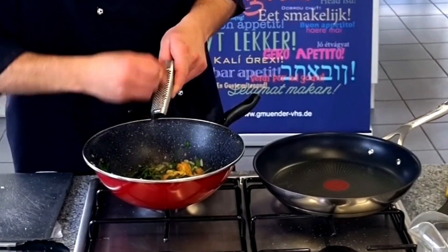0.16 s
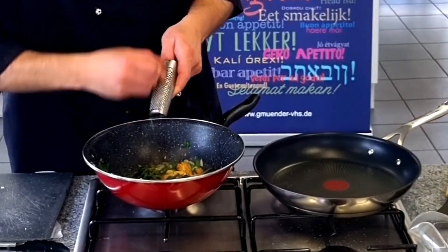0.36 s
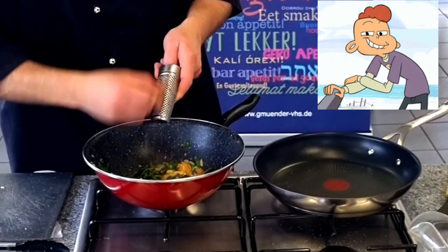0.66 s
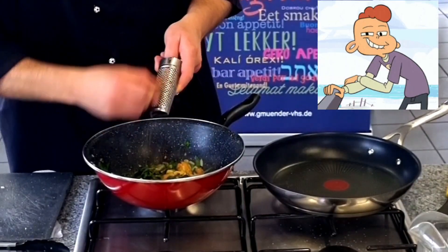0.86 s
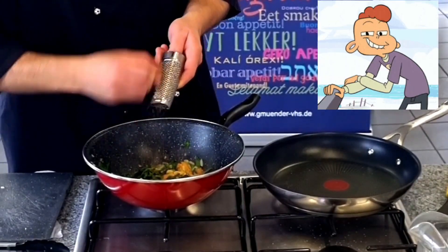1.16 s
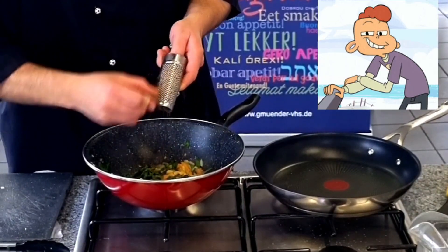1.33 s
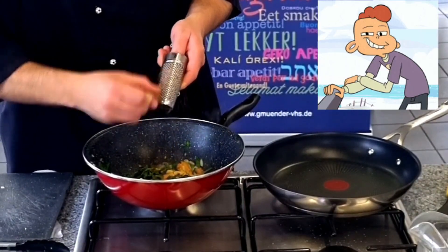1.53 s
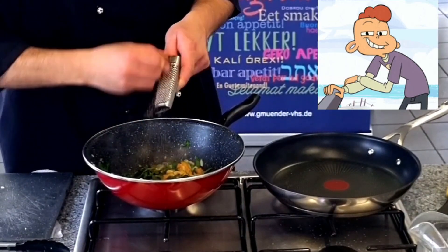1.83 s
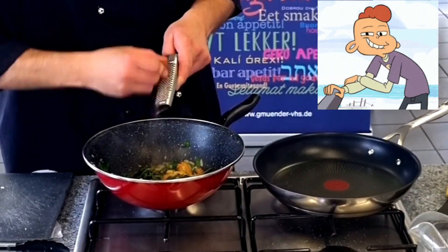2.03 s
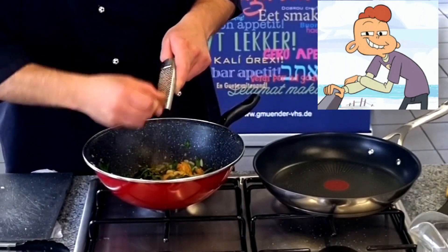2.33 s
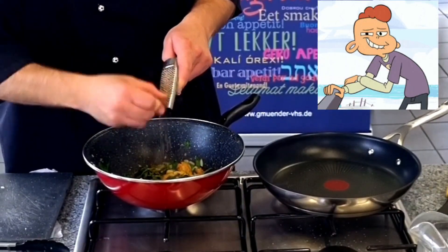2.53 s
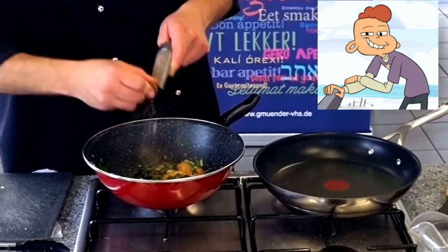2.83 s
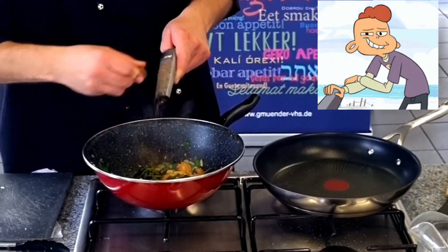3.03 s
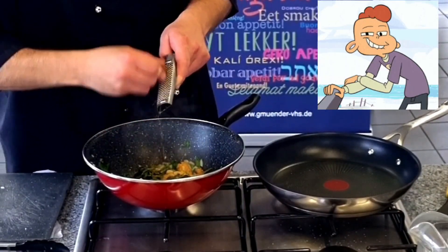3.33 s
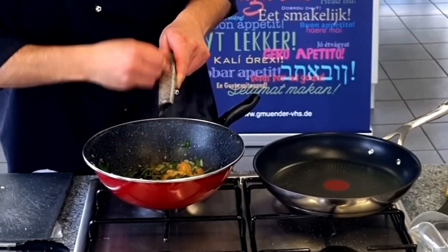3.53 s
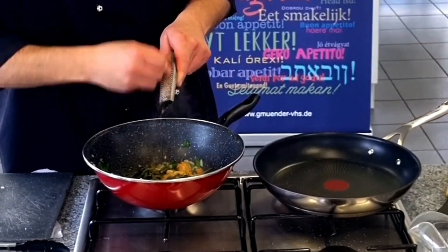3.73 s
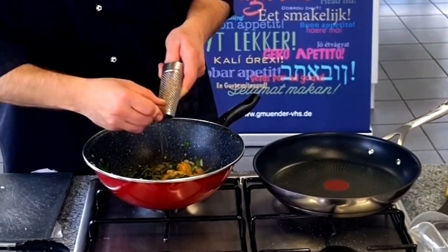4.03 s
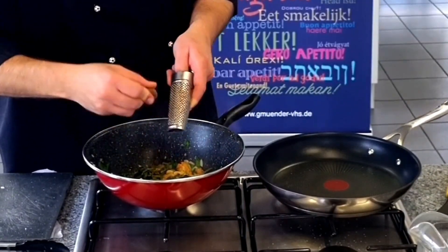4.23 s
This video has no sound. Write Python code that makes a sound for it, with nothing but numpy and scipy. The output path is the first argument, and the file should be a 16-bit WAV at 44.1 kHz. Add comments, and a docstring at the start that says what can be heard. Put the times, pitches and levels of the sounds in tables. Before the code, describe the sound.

Nutmeg is scraped on a small metal grater in quick, even strokes, pausing briefly before resuming over a faint hum.

```python
"""A tiled kitchen, a stereo pair close to a small steel hand grater, almost straight ahead.
A whole nutmeg is rubbed up and down, about ten strokes a second, biting faster on the way down.
The teeth chip it in dense tiny fractures that crackle and ring the curved sheet; now and then one snags.
After a short pause the nut is set back on the steel for a lighter second run.
The tiles answer briefly, and the ventilation hums low behind it all."""
import sys
import numpy as np
from scipy import signal
from scipy.fft import rfft, irfft
from scipy.io import wavfile
from scipy.ndimage import uniform_filter1d

SR = 44100
rng = np.random.default_rng(int(sys.argv[2]) if len(sys.argv) > 2 else 0)


def output_pcm(signal):
    """Save a mono or channel-first signal as 16-bit PCM at the path in sys.argv[1].

    Samples are clipped to [-1, 1] before scaling.
    """
    pcm = np.clip(np.atleast_2d(signal).T, -1, 1) * 32767
    wavfile.write(sys.argv[1], SR, np.round(pcm).astype(np.int16))


N = 193554
GLIDE_S = 0.016  # the nut skims the teeth this long before and after a stroke

# strokes of the nut over the teeth, up and down by turns: start_s, length_s, force_db
STROKES = [(-0.038, 0.078, -43), (0.061, 0.071, -43.5), (0.143, 0.089, -43), (0.253, 0.084, -42),
           (0.348, 0.085, -41.5), (0.455, 0.072, -40.5), (0.546, 0.081, -42), (0.659, 0.075, -41.5),
           (0.754, 0.076, -38.5), (0.854, 0.086, -38.5), (0.948, 0.091, -39.5), (1.06, 0.071, -41.5),
           (1.171, 0.082, -38), (1.274, 0.071, -37), (1.369, 0.09, -37.5), (1.476, 0.067, -37),
           (1.57, 0.091, -42.5), (1.679, 0.064, -39), (1.754, 0.089, -39.5), (1.871, 0.085, -39.5),
           (1.978, 0.068, -39.5), (2.084, 0.063, -38.5), (2.165, 0.096, -43), (2.276, 0.08, -39),
           (2.372, 0.098, -41.5), (2.484, 0.081, -39), (2.583, 0.093, -40), (2.688, 0.076, -38.5),
           (3.255, 0.082, -49.5), (3.366, 0.079, -46), (3.456, 0.097, -44.5), (3.563, 0.085, -41),
           (3.664, 0.11, -44.5), (3.769, 0.081, -41), (3.876, 0.093, -43.5), (3.982, 0.086, -42.5)]
# how freely the steel rings as the grip shifts: time_s, wall_db, body_db
RINGING = [(0.05, 5, -7.5), (0.27, 1, -2.5), (0.46, 5.5, 2), (0.7, 3.5, -1), (1.4, -0.5, -5),
           (1.87, 0, -3.5), (2.5, 2, -7.5), (3.26, -1, -4), (3.56, 3, -10), (3.88, 1, -5),
           (3.98, -1.5, -0.2)]
# spectrum of breaking nutmeg: frequency_hz, level_db
CRACKLE = [(150, -21), (330, -19.5), (650, -1), (1100, 0.5), (1700, -3), (2800, 6), (4050, -1), (4600, 4.5),
           (5500, 3), (6100, -3.5), (7000, 0.5), (8500, -9.5), (11700, -5), (13500, -5), (15800, -10.5)]
# modes of the toothed wall: pitch_hz, width_hz, level_db
WALL_MODES = [(2020, 35, -9), (2180, 72, -6.5), (2272, 87, 1.5), (2410, 124, -6), (2528, 137, -2),
              (2644, 120, -15), (2930, 32, -14), (3070, 70, -6.5), (3422, 14, -7), (3648, 35, -8.5)]
# bending modes of the whole grater: pitch_hz, width_hz, level_db
BODY_MODES = [(497, 89, -15), (869, 9, -8), (924, 20, 3.3), (984, 38, -5), (1131, 21, -9), (1266, 52, -14),
              (1369, 75, -8)]
def grating(size=7168):
    """Close up, stroke by stroke: fine breaks crackle and coarser chips ring the steel."""
    out, crackle = np.zeros((2, N + 2 * size)), colour(CRACKLE)
    time_s, *ringing = np.transpose(RINGING)
    for k, (start_s, length_s, force_db) in enumerate(STROKES):
        pressure = hand_pressure(length_s, down=k % 2, size=size)
        wall_db, body_db = (np.interp(start_s, time_s, column) for column in ringing)
        bite = tooth_rows(rows_hz=139.7, uneven=0.394, depth_db=1.65, size=size)
        # cutting needs real force, while the body already answers a light touch
        cut, push, touch = (pressure ** power * bite for power in (1.3, 1.2, .6))
        fine = fractures(per_second=10000, spread_db=-1.5, dust_db=1.0, size=size)
        chips = fractures(per_second=1300, spread_db=3.5, dust_db=-9.0, size=size)
        grit = undb(-3.0) * (driven(fine, crackle, cut) + rasp(cut, crackle))
        wall_ring = ring(WALL_MODES, detune=0.012, scatter_db=2.5, size=2048)
        body_ring = ring(BODY_MODES, detune=0.0014, scatter_db=2.2)
        wall = undb(wall_db) * driven(chips, wall_ring, push)
        body = undb(body_db) * driven(chips, body_ring, touch)
        # the wall faces the microphones and reaches them straight
        stroke = stereo_spread(grit + body, side_db=-6.5, treble_db=0.0) + wall
        at = int((start_s - GLIDE_S) * SR) + size
        out[:, at:at + size] += undb(force_db) * stroke
    return out[:, size:size + N]


def hand_pressure(length_s, down, size, skim=0.22):
    """Skim, press in, slide, ease off, skim; going down, the nut meets the teeth head-on, biting sooner."""
    press, ease = (0.16, 0.49) if down else (0.25, 0.32)  # shares of the stroke
    corners_s = [-GLIDE_S, 0, press * length_s, (1 - ease) * length_s, length_s, length_s + GLIDE_S]
    return np.interp(np.arange(size) / SR - GLIDE_S, corners_s, [0, skim, 1, 1, skim, 0])


def tooth_rows(rows_hz, uneven, depth_db, size):
    """The bite swells each time the nut rides over a row of teeth, at a wandering pace."""
    pace = np.repeat(np.exp(uneven * rng.standard_normal(size // 256 + 1)), 256)[:size]
    rows_crossed = rng.random() + np.cumsum(rows_hz * pace) / SR
    bite = undb(depth_db * np.cos(2 * np.pi * rows_crossed))
    return bite / np.sqrt(np.mean(bite ** 2))


def fractures(per_second, spread_db, dust_db, size):
    """Tiny breaks of unequal force over a smooth rub of dust, rms 1."""
    happens = rng.random(size) < per_second / SR
    strength = undb(spread_db * np.minimum(rng.exponential(size=size), 3))
    breaks = happens * strength * rng.choice([-1, 1], size)
    force = breaks / (breaks.std() + 1e-9) + undb(dust_db) * rng.standard_normal(size)
    return force / force.std()


def rasp(push, crackle, patches=3):
    """The nut crosses one patch of teeth after another, and each colours the crackle in its own way."""
    size = len(push)
    travel = np.cumsum(push ** 2) / np.sum(push ** 2) * (patches - 1)
    out = np.zeros(size)
    for patch in range(patches):
        share = np.sqrt(np.clip(1 - abs(travel - patch), 0, 1))
        voice = through(crackle, teeth(low_hz=2700, high_hz=15800, width_hz=170, count=24))
        breaks = fractures(per_second=4000, spread_db=3.5, dust_db=-5, size=size)
        out += driven(breaks, voice, push * share)
    return out


def teeth(low_hz, high_hz, width_hz, count):
    """The teeth under the nut ring at pitches of their own."""
    modes = [(pitch_hz, width_hz, 0) for pitch_hz in rng.uniform(low_hz, high_hz, count)]
    return ring(modes, detune=0, scatter_db=0.5, size=1024)


def ring(modes, detune, scatter_db, size=4096):
    """Damped modes of the steel; pitch and strength depend a little on where the sheet is touched."""
    t = np.arange(size) / SR
    pitch_hz, width_hz, level_db = np.transpose(modes)[:, :, None]
    pitch_hz = pitch_hz * (1 + detune * rng.standard_normal(pitch_hz.shape))
    gain = undb(level_db + scatter_db * rng.standard_normal(pitch_hz.shape)) * width_hz
    phase = 2 * np.pi * rng.random(pitch_hz.shape)
    partials = gain * np.exp(-np.pi * width_hz * t) * np.sin(2 * np.pi * pitch_hz * t + phase)
    onset = 1 - np.exp(-t / 0.0013)  # the wave needs a moment to cross the sheet
    return unit(partials.sum(axis=0) * onset)


def driven(force, response, push):
    """Sound of a part driven by a force; its energy follows the push of the hand."""
    return unit(through(force * push, response)) * np.sqrt(np.sum(push ** 2))


# a tooth snags hard and lets go: start_s, ping_db, crack_db
SNAGS = [(0.0843, -22.5, -47), (0.7674, -23, -30), (0.8732, -27, -26), (1.1905, -26, -25),
         (1.391, -41, -21), (1.79, -31, -33), (1.8892, -23, -49), (2.4127, -23, -29.5), (2.5157, -26, -44),
         (3.395, -28.5, -48), (3.785, -25.5, -39)]
def snags(crack_s, damping_per_s, size=4096):
    """A larger chip tears off in a burst; the freed teeth sing and the wall, damped by the nut, pings."""
    out, t, crackle = np.zeros(N + size), np.arange(size) / SR, colour(CRACKLE)
    for start_s, ping_db, crack_db in SNAGS + light_snags():
        burst = np.sqrt(t) * np.exp(-t / crack_s) * rng.standard_normal(size)
        freed_teeth = teeth(low_hz=4180, high_hz=7070, width_hz=840, count=4)
        crack = through(burst, freed_teeth) + through(burst, crackle)
        ping = ring(WALL_MODES, detune=0.005, scatter_db=5.0) * np.exp(-damping_per_s * t)
        at = int(start_s * SR)
        out[at:at + size] += peak_at(ping, ping_db) + peak_at(crack, crack_db)
    return out[:N]


def light_snags(chance=0.35, mean_share=0.61, ping_over_db=10.5, crack_over_db=7.5):
    """Some strokes catch a little part of the way along, the louder the harder they are pushed."""
    catches = []
    for start_s, length_s, force_db in STROKES:
        luck, place = rng.random(2)
        if luck < chance:
            catch_s = max(start_s + length_s * mean_share * (.5 + place), 0)
            catches.append((catch_s, force_db + ping_over_db, force_db + crack_over_db))
    return catches


# the nut is set back on the grater and settles: start_s, level_db
KNOCKS = [(3.188, -41.5), (3.203, -42)]
# the steel under that knock: pitch_hz, width_hz, level_db
KNOCK_MODES = [(862, 32, 0.5), (2420, 68, -4), (2800, 79, -8), (3720, 80, -14), (4500, 120, -11),
               (7100, 280, -16), (11500, 480, -17)]
# the crumb's tiny bright tick: pitch_hz, width_hz, level_db
TICK_MODES = [(10170, 360, 2.5), (12700, 1000, -4), (14700, 500, 0)]
def contacts(tick_s, tick_db, size=4096):
    """In the pause a falling crumb ticks brightly, then the nut knocks softly as it is set back."""
    out = np.zeros(N)
    knocks = [(start_s, level_db, KNOCK_MODES) for start_s, level_db in KNOCKS]
    for start_s, level_db, modes in knocks + [(tick_s, tick_db, TICK_MODES)]:
        at = int(start_s * SR)
        out[at:at + size] += peak_at(ring(modes, detune=0, scatter_db=1, size=size), level_db)
    return out


def stereo_spread(x, side_db, treble_db):
    """The sheet radiates unevenly and pans scatter it, so the microphones differ, most in the treble."""
    treble = signal.lfilter(*signal.butter(1, 4500, "high", fs=SR), x)
    side = undb(side_db) * scatter(x, smear_s=0.0015) + undb(treble_db) * scatter(treble, smear_s=0.0017)
    return np.array([x + side, x - side])


def scatter(x, smear_s, size=1024):
    """Things close by smear the sound over a few milliseconds without colouring it."""
    spectrum = rfft(rng.standard_normal(size) * np.exp(-np.arange(size) / SR / smear_s))
    allpass = np.roll(irfft(spectrum / abs(spectrum)), size // 4)
    return signal.fftconvolve(x, allpass)[size // 4:size // 4 + len(x)]


def kitchen(x, tail_db, t60_s, size=24000):
    """Farther off, the tiled walls send a short tail back to each microphone."""
    t = np.arange(size) / SR
    tail = unit(rng.standard_normal(size) * np.exp(-np.log(1000) * t / t60_s) * (t > .005))
    return undb(tail_db) * through(x, tail)


# how the hum wavers: time_s, deep_db, upper_db, boom_db
HUM_LEVELS = [(0.07, -34, -48, -40), (0.25, -56, -32, -38), (0.55, -53, -38.5, -40), (0.92, -88, -33, -39),
              (1.08, -39.5, -43.5, -41.5), (1.72, -44.5, -49.5, -39), (2.218, -35, -42.5, -44.5),
              (2.55, -39.5, -41.5, -50), (3.201, -45, -42.5, -45), (3.65, -47, -39, -43.5),
              (4.08, -38, -45, -44.5), (4.39, -42.5, -38.5, -43)]
# low modes of the room, in which the ventilation booms: pitch_hz, width_hz, level_db
ROOM_MODES = [(100.5, 10.6, -1.5), (135.8, 13.9, 0), (170.5, 8.6, 2), (205.2, 12.2, -4), (256, 8.5, -20.5),
              (303.5, 117, -19), (494, 94, -26)]
# spectrum of moving air: frequency_hz, level_db
AIR = [(25, 2), (60, 7), (130, 6), (290, 0.5), (400, -10), (500, -0.5), (750, -2), (1100, -7),
       (1700, -10.5), (3000, -13.5), (7000, -23), (9000, -31), (15800, -28)]
def ventilation(air_db):
    """Room tone: two deep drones and the room's boom, alike at both microphones, in a wider rush of air."""
    time_s, *levels_db = np.transpose(HUM_LEVELS)
    deep, upper, boom = (undb(np.interp(np.arange(N) / SR, time_s, column)) for column in levels_db)
    hum = deep * drone([(61.9, 2.24, 0)], steadiness=0.77)
    hum += upper * drone([(76.46, 7.0, 0)], steadiness=1.0)
    hum += boom * drone(ROOM_MODES, steadiness=0.85)
    shared, left, right = (through(rng.standard_normal(N), colour(AIR)) for _ in range(3))
    rush = 0.73 * shared + 0.69 * np.array([left, right])
    flow = (boom / boom.mean()) ** 0.5  # the rush swells with the boom
    return hum + undb(air_db) * flow * rush


def drone(modes, steadiness):
    """Noise in narrow, steep resonances; steadiness (0-1) evens out its slow swells."""
    hz = np.fft.rfftfreq(N, 1 / SR)
    gain = sum(undb(level_db) / (1 + ((hz - pitch_hz) / width_hz) ** 2) ** 2
               for pitch_hz, width_hz, level_db in modes)
    noise = irfft(rfft(rng.standard_normal(N)) * gain, N)
    steadied = noise / uniform_filter1d(noise ** 2, SR // 5) ** (steadiness / 2)
    return steadied / steadied.std()


def colour(points, size=2048):
    """Causal response with a spectrum drawn through points of frequency_hz, level_db."""
    frequency_hz, level_db = np.transpose(points)
    log_hz = np.log(np.fft.rfftfreq(size, 1 / SR) + 1)
    gain = undb(np.interp(log_hz, np.log(frequency_hz), level_db))
    cepstrum = irfft(np.log(gain))
    cepstrum[1:size // 2] *= 2  # fold to minimum phase
    cepstrum[size // 2 + 1:] = 0
    return unit(irfft(np.exp(rfft(cepstrum))))


def through(x, response):
    """Pass a sound through an impulse response."""
    return signal.fftconvolve(x, response)[:len(x)]


def unit(response):
    """Scale a response so that it passes white noise at the same level."""
    return response / np.sqrt(np.sum(response ** 2))


def peak_at(x, level_db):
    """Scale a sound to a peak level."""
    return undb(level_db) * x / abs(x).max()


def undb(db):
    """Decibels to gain."""
    return 10 ** (np.asarray(db) / 20)


def scene():
    """From the microphones: the grater in front, a little to the left, with the kitchen all around."""
    strokes = grating()
    clicks = snags(crack_s=0.0034, damping_per_s=33) + contacts(tick_s=2.889, tick_db=-48)
    grater = strokes + stereo_spread(clicks, side_db=-15, treble_db=-2.5)
    room = np.array([kitchen(channel, tail_db=-5.0, t60_s=0.43) for channel in grater])
    balance = undb([[-.3], [-1.2]])  # left, right
    return balance * (grater + room) + ventilation(air_db=-51)


def record(dry, top_hz=15900):
    """The recorder cuts the very top."""
    return signal.sosfilt(signal.ellip(10, .2, 80, top_hz, fs=SR, output="sos"), dry)


dry = scene()
out = record(dry)
output_pcm(out)
```